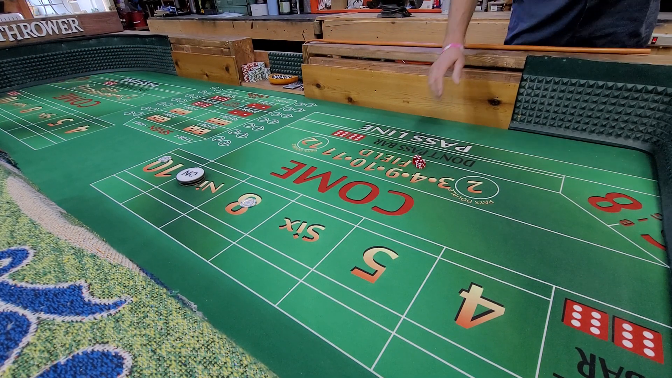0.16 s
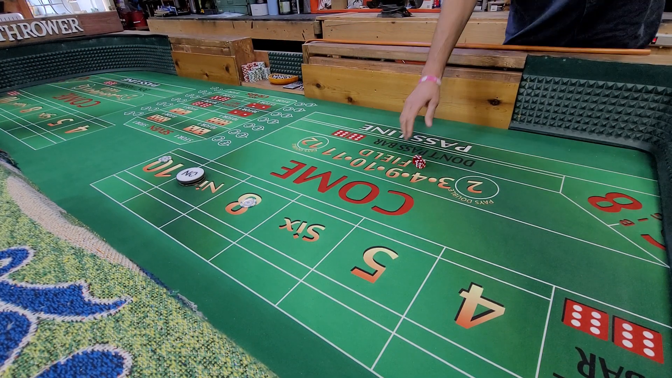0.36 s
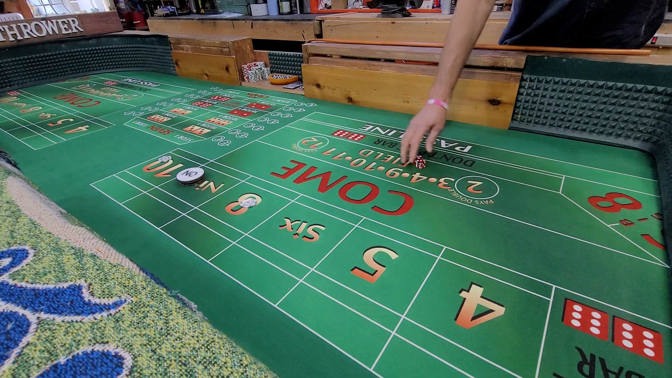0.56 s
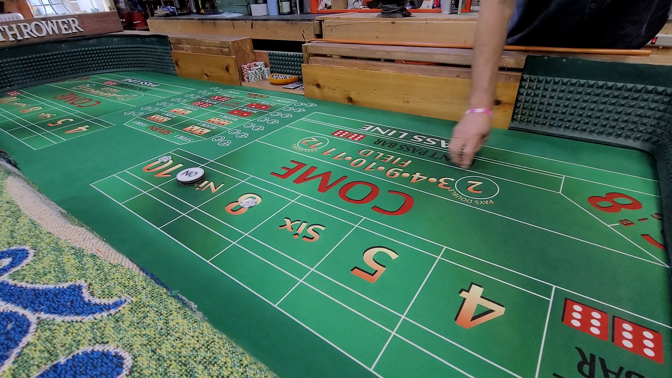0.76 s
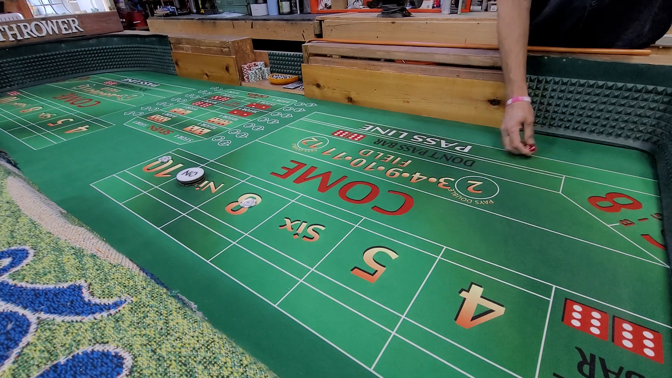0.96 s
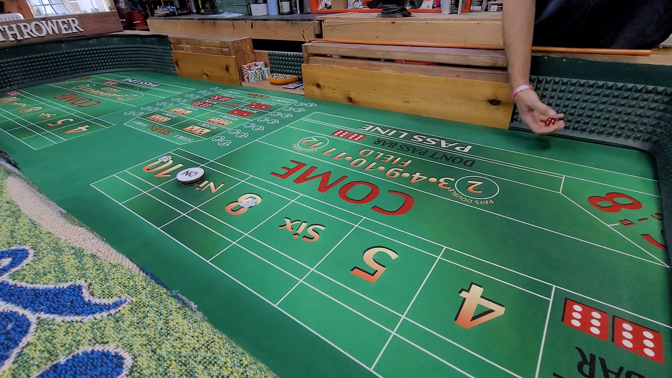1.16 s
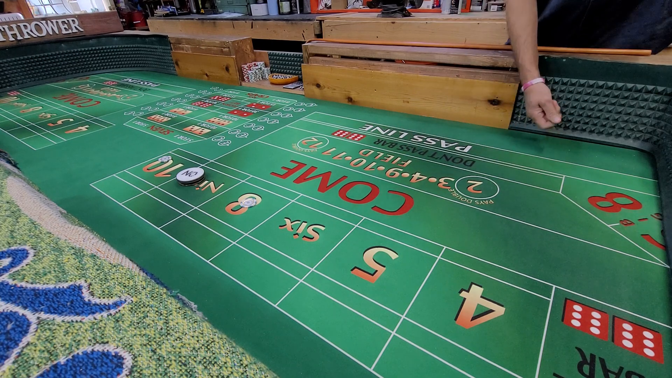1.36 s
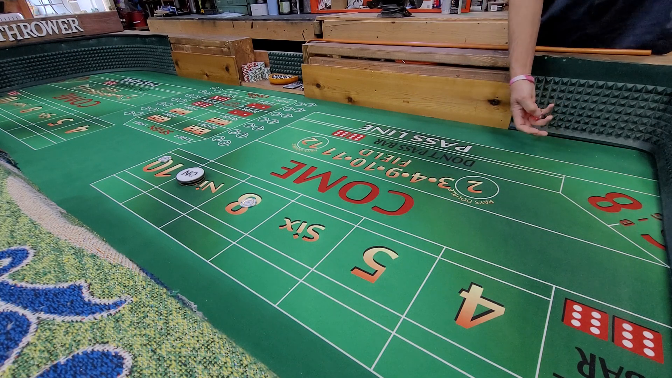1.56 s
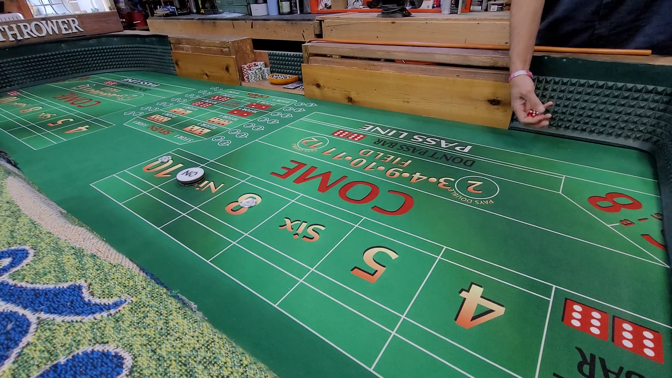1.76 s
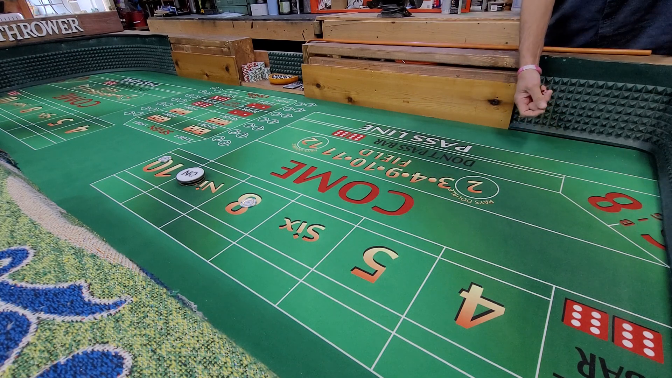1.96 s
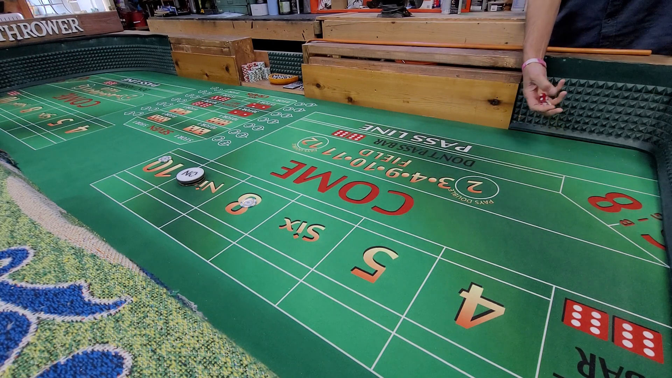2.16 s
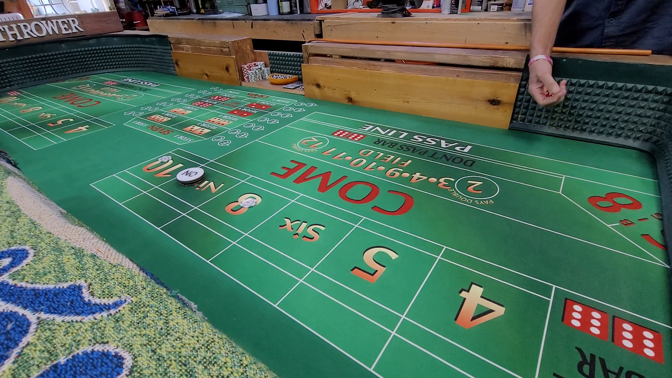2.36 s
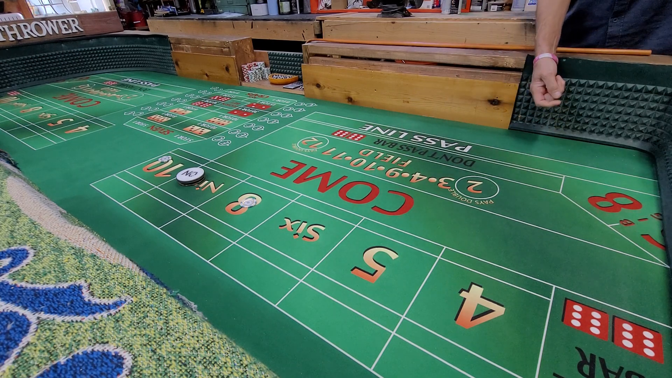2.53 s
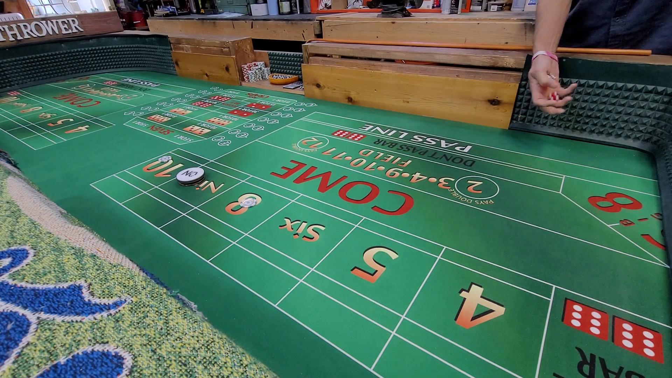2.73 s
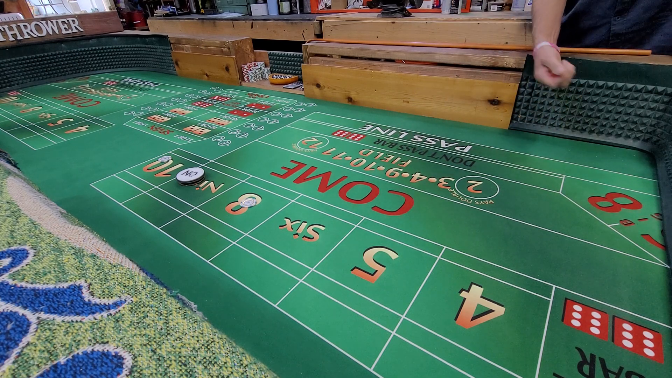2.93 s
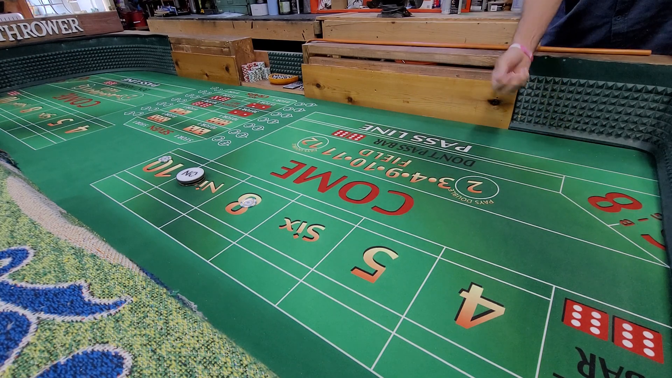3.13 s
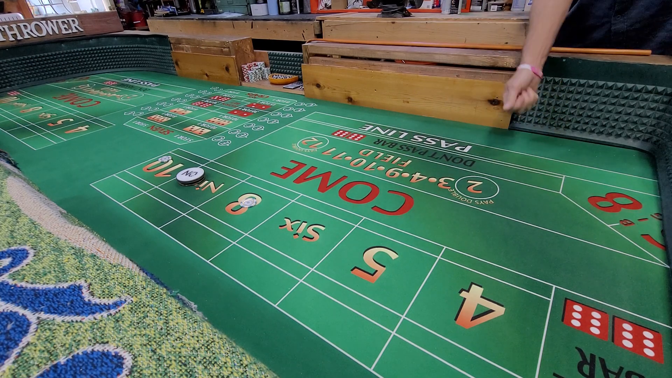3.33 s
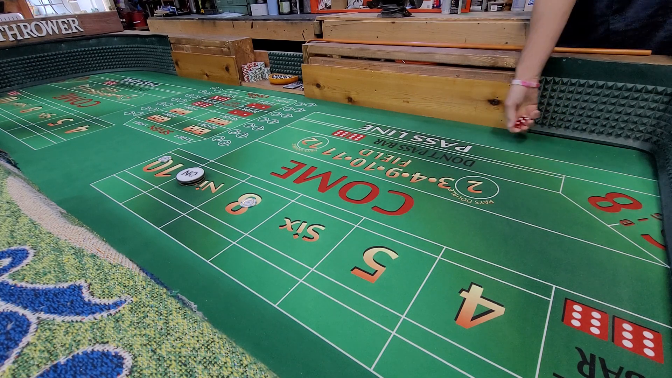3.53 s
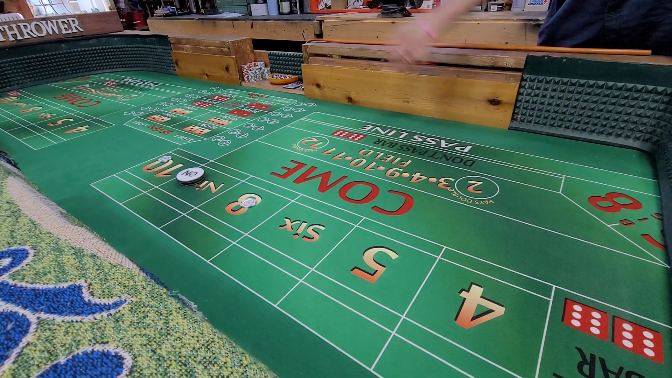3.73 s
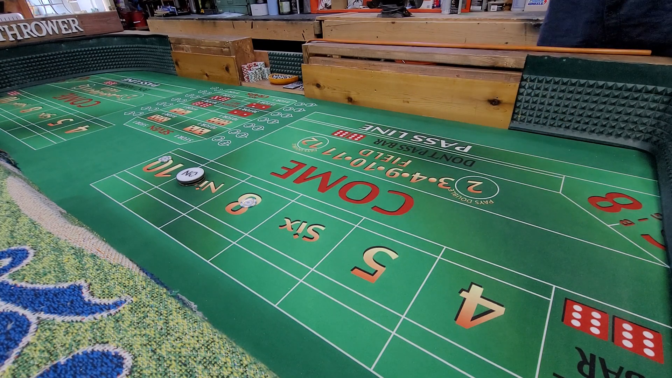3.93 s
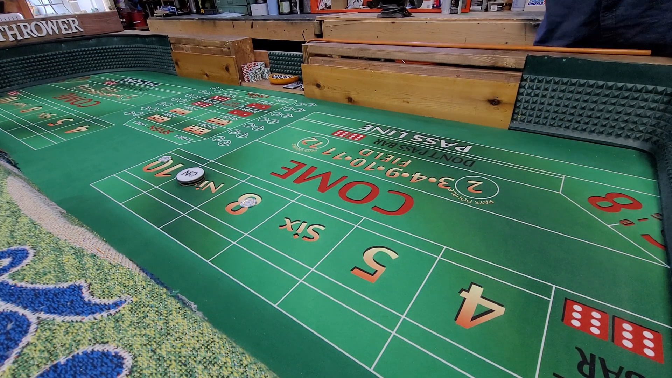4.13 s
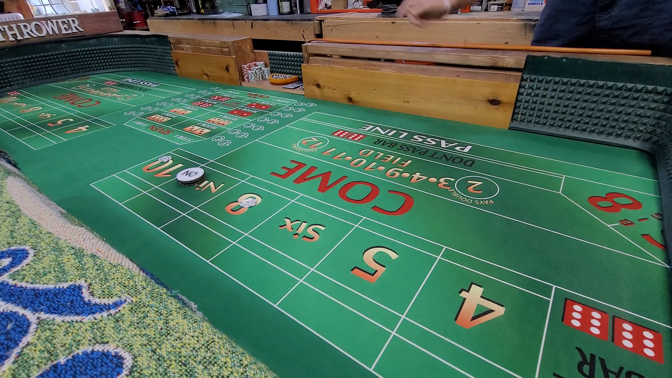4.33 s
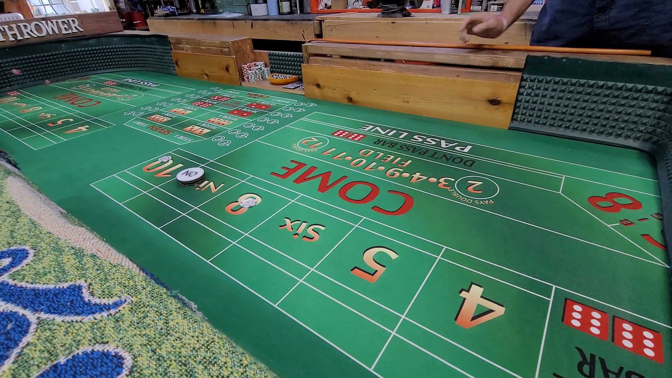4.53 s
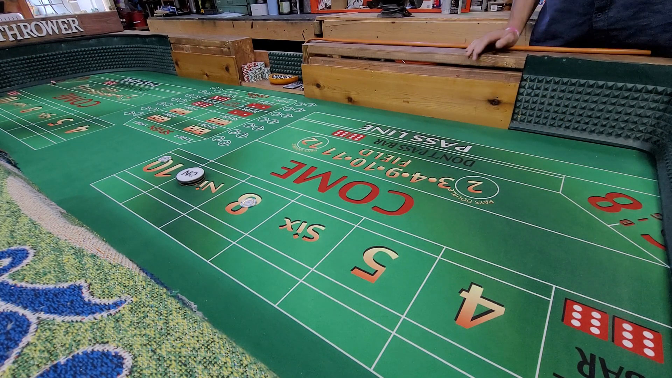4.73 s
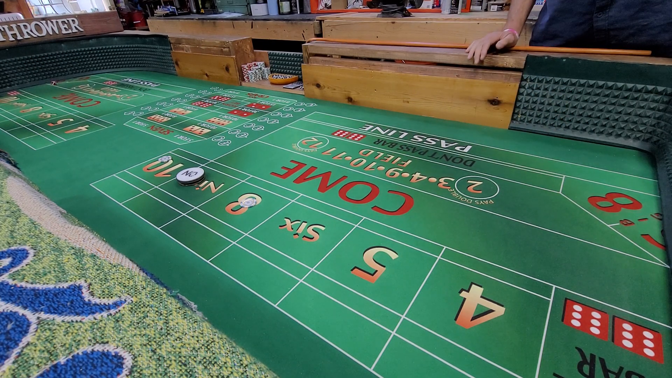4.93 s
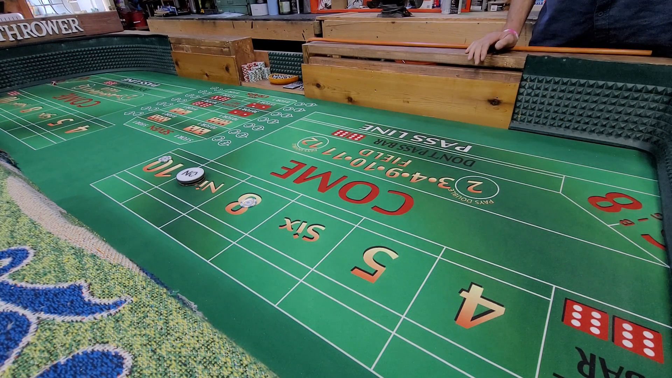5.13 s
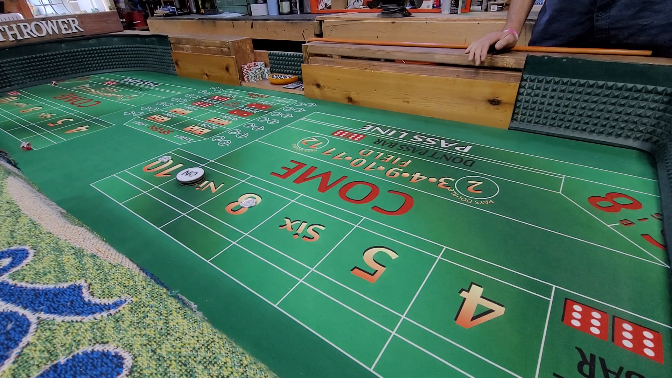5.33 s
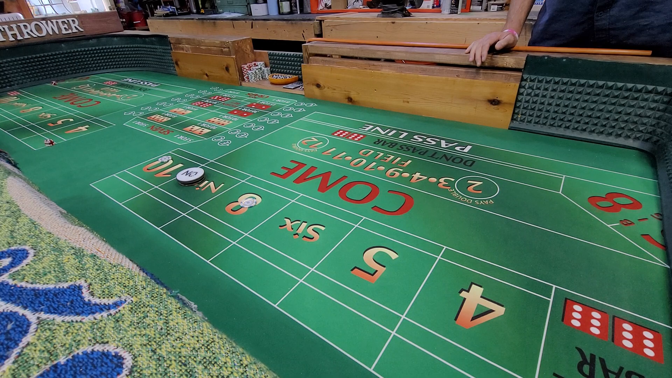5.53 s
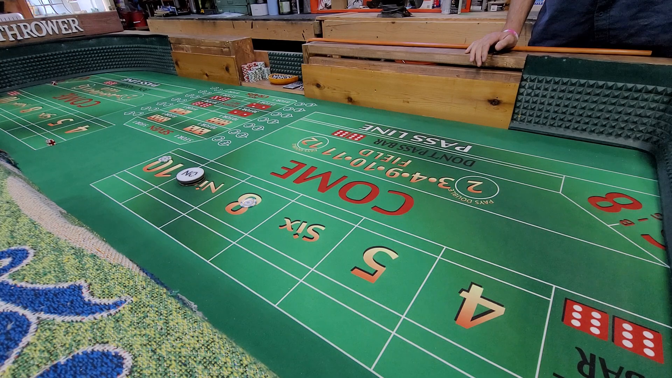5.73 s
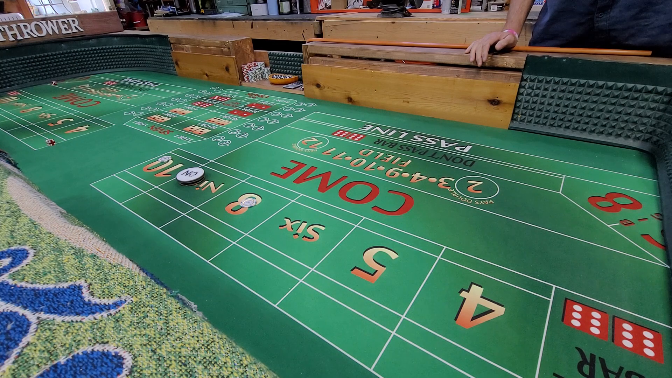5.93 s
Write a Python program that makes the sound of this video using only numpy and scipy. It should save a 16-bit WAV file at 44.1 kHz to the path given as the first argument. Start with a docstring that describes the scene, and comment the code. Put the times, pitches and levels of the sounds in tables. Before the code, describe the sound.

In a quiet room, a hand picks up two dice from a felt gaming table and clicks them together irregularly, faster just before the throw. After about a second of near silence they land far down the table with a loud woody thud and bright clack, bump again, knock the end wall, and tumble more and more dully. Low rumble and faint pulsing insect-like hiss continue; stereo microphone at the table.

```python
"""Two dice click together in one hand over a felt craps table, as small hollows rung by impact.
Thrown to the far end, they land with a thud (damped modes of the wooden bed) and a bright clack (cracks and
high modes), knock the end wall and tumble on ever more softly. Dense decaying noise makes the room.
Fingers brush the felt and small tocks sound, over a low rumble and a throbbing hiss like an insect chorus,
both of them coloured noise."""
import sys
import numpy as np
from scipy import signal
from scipy.fft import rfft, irfft
from scipy.io import wavfile
from scipy.ndimage import uniform_filter1d

SR = 44100
rng = np.random.default_rng(int(sys.argv[2]) if len(sys.argv) > 2 else 0)


def unload_audio(sound):
    """Save the sound as a 16-bit wav file, at the path given as the first command line argument."""
    columns = np.transpose(np.atleast_2d(sound))
    # keep every value between -1 and 1, then stretch to whole-number steps
    steps = np.round(np.clip(columns, -1, 1) * 32767)
    wavfile.write(sys.argv[1], SR, steps.astype(np.int16))


N = 264140
TIME = np.arange(N) / SR  # time in the scene [s]
AGE = TIME[:SR * 3 // 4]  # time since a hit [s]

# dice meeting in the hand: (time [s], level [dB], ring [Hz], sharp edge [dB], room [dB],
# delay until they touch again [ms], 0 for none)
HAND_CLICKS = [(0.7187, -26.5, 2870, -14, -16.5, 2), (1.263, -30, 3750, 1.5, -21, 0),
               (1.7521, -21, 3350, -37, -13.5, 0), (2.188, -26.5, 2950, -19, -12, 5.5),
               (2.1971, -30, 3050, 5, 0, 0), (2.437, -42.5, 2900, -20, 0.5, 0),
               (2.591, -42.5, 3340, -6, -12, 1), (2.891, -34, 2700, -24, -11, 0),
               (2.9246, -26.5, 3600, -16, -11, 12), (3.0522, -32.5, 2700, -22, -4.5, 0),
               (3.169, -30, 3560, -25, -7.5, 5), (3.3731, -29, 2500, -28, -7, 12.5),
               (3.4594, -34, 3900, -2, -8, 1)]
# colour of the sharp edge: (frequency [Hz], level [dB])
EDGE_COLOUR = [(700, -5), (1400, -7), (3000, 3), (6500, 7.5), (8500, -1), (9800, -10), (11500, -10),
               (13000, -10), (15500, -13)]
REBOUND_DB = 0.5  # the second touch against the first
SWELL_CYCLES = 0.67  # the hollow between the dice reaches its crest in this many cycles
PALM_SPARED = 2.5  # how strongly a sharp, edge-on touch keeps its push out of the palm


def hand_clicks(palm_hz=1850, palm_db=-8, palm_t60=0.0024, edge_t60=0.0054, cut_hz=1400):
    """Cavity resonance: a touch rings the hollow between the dice and the palm; so small a source has no bass."""
    out = np.zeros((2, N))
    palm = ring([(palm_hz, palm_db, palm_t60)])
    no_bass = signal.butter(4, cut_hz, "highpass", fs=SR, output="sos")
    # the hand beams its ring at the microphone, so the room gets less of that band
    room_colour = [(1500, 7.5), (2600, 3), (3600, 3.5), (6000, -3.0), (12000, 7)]
    for s, db, hz, edge_db, room_db, rebound_ms in HAND_CLICKS:
        lag_ms = -.21 + 0.071 * rng.standard_normal()  # the hand moves about, right of centre
        swell = hz * AGE / SWELL_CYCLES
        hollow = swell * np.exp(1 - swell) * np.sin(2 * np.pi * hz * AGE)
        body = hollow + palm / (1 + PALM_SPARED * undb(edge_db))
        edge = undb(edge_db) * np.linalg.norm(hollow) * snap(EDGE_COLOUR, edge_t60, lag_ms)
        click = signal.sosfilt(no_bass, ports(body, lag_ms) + edge)
        reflections = diffuse(stretch=0.84, early_db=2.5, early_t60=0.056)
        room = colour(unit(reflections), room_colour)
        touches = [(s, db)]
        if rebound_ms > .5:
            touches.append((s + rebound_ms / 1000, db + REBOUND_DB))
        for touch_s, touch_db in touches:
            add(out, touch_s, undb(touch_db) * click)
            add(out, touch_s + 0.0018, undb(touch_db + room_db) * through(click[1], room))
    return out


# dull blows on the felt, an early one already fading, then the thrown dice: (time [s], level [dB])
FELT_THUDS = [(-.06, -12), (4.4515, -5), (4.454, 2.5), (4.467, 2.5), (4.478, 0), (4.81, 4.5), (5.221, -3),
              (5.353, -11.5), (5.448, -21), (5.543, -29)]
# modes of the table bed: (frequency [Hz], level [dB], t60 [s])
TABLE_BED_MODES = [(86.7, -8, 1), (135.2, -2.5, 0.58), (200.5, 0.5, 0.37), (226, -4, 0.27),
                   (295, -2.5, 0.26), (327.7, 1, 0.16), (361.3, -5, 0.37), (441.5, 1.5, 0.37),
                   (461, -6, 0.13), (565, -0.5, 0.36), (605, -3, 0.52), (694, -8, 0.56), (673, -0.5, 0.52),
                   (816, 1, 0.47), (850, 4.5, 0.19), (1132, -3.5, 0.43), (1160, -20, 0.18),
                   (1157, -1, 0.44), (1283, -0.5, 0.48), (1660, -6.5, 0.62), (1610, -11.5, 0.24),
                   (1760, -0.5, .3), (1860, 0, 0.29), (2050, -5, 0.39)]
# colour of the bed's blow and dense ringing: (frequency [Hz], level [dB])
BED_COLOUR = [(50, -31), (90, 1), (170, -4), (350, 3.5), (520, 2), (1000, -3.5), (1700, -1), (2400, -4),
              (4000, -9), (9000, -6)]
# the thrown dice land, then lose speed, and the felt's softness corner falls with it
LANDS_S, LANDING_HZ, SLOWING_S = 4.474, 1227, 0.53


def thuds(modes_db=2.5, dense_db=6, blow_db=2, lag_ms=0.46, scatter_ms=0.13, pan_db=-1):
    """Contact time on felt: the slower the die, the longer the push and the duller the bed's modal answer."""
    out = np.zeros((2, N))
    blow = unit(colour(ports(1. * (AGE == 0), lag_ms), BED_COLOUR))
    for s, db in FELT_THUDS:
        soft_hz = LANDING_HZ * np.exp(-max(s - LANDS_S, 0) / SLOWING_S)
        dense = unit(colour(diffuse(stretch=0.98, early_db=-27, early_t60=0.055), BED_COLOUR))
        modal = board(TABLE_BED_MODES, lag_ms, scatter_ms)
        answer = undb(modes_db) * modal + undb(dense_db) * dense + undb(blow_db) * blow
        cushion = signal.butter(2, soft_hz, fs=SR, output="sos")
        add(out, s, undb(db) * signal.sosfilt(cushion, answer))
    return out * undb([[pan_db], [-pan_db]])


# hard dice faces clacking as they land: (time [s], level [dB], sharp edge [dB])
DICE_CLACKS = [(4.459, -14, -11), (4.4608, -8, -38), (4.462, -3, -1), (4.464, -10.5, 7)]
# modes of the clack before the direct sound's extra fade: (frequency [Hz], level [dB], t60 [s])
CLACK_RING_MODES = [(4555, -8.5, 0.071), (5130, 0, 0.026), (6120, 1.5, 0.044), (6380, -10, 0.046),
                    (6570, -2, 0.049), (6950, 1.5, 0.047), (7770, -8, .04)]
# colour of the crack and its room: (frequency [Hz], level [dB])
CLACK_COLOUR = [(800, -1), (1800, -2.5), (2600, -4.5), (3300, -4), (4400, -5.5), (6300, -4), (8200, -5.5),
                (9300, -3.5), (11500, 0), (13000, -5), (14200, -12), (15500, -15)]


def clacks(ring_db=3, edge_db=0, ring_room_db=2, edge_room_db=5, rattle_t60=0.0085, lag_ms=0.332, pan_db=2):
    """Impact of stiff bodies: bare plastic on plastic gives a crack and a high ring that the room prolongs."""
    out = np.zeros((2, N))
    tone = ring(CLACK_RING_MODES)
    for s, db, sharp_db in DICE_CLACKS:
        direct = undb(ring_db) * unit(ports(tone * fade(rattle_t60), lag_ms))
        direct = direct + undb(edge_db + sharp_db) * snap(CLACK_COLOUR, 0.0014, lag_ms)
        room = diffuse(stretch=1.0, early_db=-16, early_t60=0.14)
        ring_room = undb(ring_room_db) * unit(through(tone, room))
        edge_room = undb(edge_room_db + sharp_db) * unit(colour(room, CLACK_COLOUR))
        add(out, s, undb(db) * direct * undb([[pan_db], [-pan_db]]))
        add(out, s + .004, undb(db) * (ring_room + edge_room))
    return out


# a die against the end wall: (time [s], level [dB])
END_WALL_KNOCKS = [(4.9492, 1.5)]
# modes of the end wall: (frequency [Hz], level [dB], t60 [s])
END_WALL_MODES = [(299, -8.5, 1), (361, -8, 0.7), (422, -1.5, 0.38), (640, -5, 0.34), (672, 1.5, .3),
                  (713, -1, 0.23), (766, -1, 0.51), (800, 3, 0.45), (880, 4.5, 0.5), (980, -15, 0.3),
                  (1026, -13, 0.36), (1154, 6, 0.32), (1200, 0, 0.55), (1266, 2, 0.38), (1310, -6, 0.35),
                  (1430, -5, 0.28), (1526, -9, .42), (1580, -1, 0.48), (1700, -5, 0.48), (1775, -3, 0.3),
                  (1840, -8, 0.38), (1906, -6, 0.49), (1975, -14.5, 0.52), (2030, -13.5, 0.36),
                  (2156, -17, 0.23)]
# colour of the wall's blow and dense ringing: (frequency [Hz], level [dB])
WALL_COLOUR = [(150, -44.5), (260, -3.5), (380, -5.5), (750, 0), (1050, -1.5), (1300, -0.5), (1850, -2.5),
               (2250, -16), (2700, -29.5), (3700, -20.5), (4800, -37), (14000, -58)]


def wall_knocks(modes_db=5.0, dense_db=5, blow_db=-4, lag_ms=0.42, scatter_ms=0.064):
    """Panel modes: the end wall answers higher than the bed; its rubber facing swallows the treble."""
    out = np.zeros((2, N))
    blow = unit(colour(ports(1. * (AGE == 0), lag_ms), WALL_COLOUR))
    for s, db in END_WALL_KNOCKS:
        dense = unit(colour(diffuse(stretch=1.04, early_db=-39, early_t60=.1), WALL_COLOUR))
        modal = board(END_WALL_MODES, lag_ms, scatter_ms)
        answer = undb(modes_db) * modal + undb(dense_db) * dense + undb(blow_db) * blow
        add(out, s, undb(db) * answer)
    return out


def rolling(db=-55.5):
    """Rolling noise: turning dice murmur in the bed, a low band that is faint until they tumble."""
    band = [(40, -29), (65, -1.5), (130, 1), (180, 0), (280, -30), (800, -58)]
    murmur = shape(noise(TIME, RINGING_WIDTH), undb(along(band, bins(TIME))))
    return level(murmur, db) * np.interp(TIME, [4.95, 5.25, 5.6, 6], [0.083, 1, 0.98, 0.88])


def felt_brush(s=0.86, spread_s=0.079, db=-60.5):
    """Friction noise: fingers sweep over the cloth as they gather the dice, a hiss that swells and fades."""
    cloth = [(500, -5), (1500, 9.5), (4000, 0), (9000, -4), (11500, -2), (15500, -4)]
    hiss = colour(rng.standard_normal((2, N)), cloth)
    return level(hiss, db) * np.exp(-((TIME - s) / spread_s) ** 2)


# small dull tocks around the table: (time [s], frequency [Hz], level [dB], t60 [s])
TABLE_TOCKS = [(.41, 448, -44, 0.067), (.928, 1460, -39.5, 0.042), (4.745, 445, -40, 0.15)]


def tocks(rise_s=0.0017, lag_ms=0.24):
    """Single-mode excitation: each soft touch sounds one short note with a rounded onset."""
    out = np.zeros((2, N))
    for s, hz, db, t60 in TABLE_TOCKS:
        note = ring([(hz, db, t60)]) * (1 - np.exp(-AGE / rise_s))
        add(out, s, ports(note, lag_ms))
    return out


# colour of the far insect chorus: (frequency [Hz], relative level [dB])
CHORUS_COLOUR = [(2400, -29), (3000, -19), (3800, -8), (4300, -8), (4900, -5), (5500, -4.5), (6500, -10.5),
                 (7300, -18.5), (8200, -20.5), (9200, -39.5), (10800, -32), (12500, -38.5), (15500, -34)]
# colour of the nearest caller: (frequency [Hz], relative level [dB])
CALLER_COLOUR = [(4500, -24), (5700, -2.5), (6400, -0.5), (7000, 2.5), (7600, -13.5), (8200, -15),
                 (9200, -29), (10800, -23), (13000, -36), (15500, -35)]
# the nearest insect chirps at a steady pace
FIRST_CHIRP_S, CHIRP_PERIOD_S = .195, .3295


def insects(chorus_db=-53.0, caller_db=-59.0, chirp_s=0.11, stroke_hz=78, stroke_depth=0.99,
            waver_db=0.74, paths_t60=0.14, blur=0.7, pan_db=-1):
    """Amplitude modulation: one caller rasps by wing strokes in steady chirps; a far chorus blurs into hiss."""
    crowd = level(far(rng.standard_normal(N), paths_t60), 0) + blur * rng.standard_normal((2, N))
    chorus = colour(crowd, CHORUS_COLOUR) * undb(waver_db * walk(10))
    chirp_times = np.arange(FIRST_CHIRP_S, N / SR, CHIRP_PERIOD_S)
    chirps = sum(np.exp(-((TIME - s) / chirp_s) ** 2) for s in chirp_times)
    stroke_rate = stroke_hz * (1 + 0.0486 * walk(15))
    strokes = 1 + stroke_depth * np.sin(2 * np.pi * np.cumsum(stroke_rate) / SR)
    rasp = rng.standard_normal(N) * chirps * strokes
    caller = colour(far(rasp, paths_t60), CALLER_COLOUR)
    return level(chorus, chorus_db) + level(caller, caller_db) * undb([[pan_db], [-pan_db]])


# spectrum of the low room noise: (frequency [Hz], relative density [dB per Hz])
RUMBLE_SPECTRUM = [(12, -59), (20, -14), (38, -5), (90, -2.5), (150, -13.5), (177, -14), (305, -18),
                   (339, -19.5), (409, -18), (573, -20), (853, -20), (1050, -27), (1350, -25), (2380, -31),
                   (3000, -38.5), (3900, -43), (6600, -120)]
# width of the rumble: (frequency [Hz], side minus mid [dB])
RUMBLE_SIDES = [(40, -2), (100, -19), (200, -4.5), (400, 2), (900, 7.5), (3000, 0)]
RUMBLE_DB = -54.5  # rms level before panning


def rumble(waver_db=1, pan_db=-0.82):
    """Shaped noise: low room noise that wanders in level, most alike on both sides near 100 Hz."""
    air = shape(noise(TIME, RUMBLE_SIDES), undb(along(RUMBLE_SPECTRUM, bins(TIME))))
    return level(air * undb(waver_db * walk(6.165)), RUMBLE_DB) * undb([[pan_db], [-pan_db]])


def snap(points, t60, lag_ms):
    """Broadband impact: a very short burst of noise is the crack of two hard faces meeting."""
    return unit(colour(ports(rng.standard_normal(len(AGE)) * fade(t60), lag_ms), points))


def board(modes, lag_ms, scatter_ms):
    """Modal radiation of a wide panel: each mode has its own place, so its own lag between the microphones."""
    lags = lag_ms + scatter_ms * rng.standard_normal(len(modes))
    signed = [(-1) ** k * ring([mode]) for k, mode in enumerate(modes)]
    return unit(sum(ports(tone, lag) for tone, lag in zip(signed, lags)))


def ring(modes):
    """Modal superposition: damped sines start together with alternating signs."""
    out = 0
    for k, (hz, db, t60) in enumerate(modes):
        out = out + (-1) ** k * undb(db) * np.sin(2 * np.pi * hz * AGE) * fade(t60)
    return out


def fade(t60):
    """Exponential decay: a hit falls by 60 dB in t60 seconds."""
    return undb(-60 * AGE / t60)


# decay of table and room, before each source's stretch: (frequency [Hz], t60 [s])
ROOM_DECAY = [(80, 0.71), (200, 0.53), (450, 0.53), (1000, 0.49), (2000, 0.49), (4000, .36), (8000, 0.31),
              (15000, 0.095)]
# width of the ringing and of the rolling: (frequency [Hz], side minus mid [dB])
RINGING_WIDTH = [(80, -24), (170, -21), (330, -0.5), (700, 4.5), (1400, 2.5), (3000, -1), (12000, 1.5)]


def diffuse(stretch, early_db, early_t60):
    """Diffuse field: a quick flurry inside the table, then the room, whose treble dies first."""
    source = noise(AGE, RINGING_WIDTH)
    centres = [hz for hz, _ in ROOM_DECAY]
    flurry = undb(early_db) * fade(early_t60)
    out = 0
    for row, (_, t60) in zip(np.eye(len(centres)), ROOM_DECAY):
        mask = along(list(zip(centres, row)), bins(AGE))  # overlapping bands that sum to one
        out = out + shape(source, mask) * (fade(t60 * stretch) + flurry)
    return out


def through(x, response):
    """Convolution: pass a short sound through a stereo response."""
    return signal.fftconvolve(np.atleast_2d(x), response, axes=1)[:, :len(AGE)]


def far(x, t60):
    """Multipath interference: many fixed paths comb the spectrum differently on each side."""
    paths = rng.standard_normal((2, len(AGE))) * fade(t60)
    return irfft(rfft(x) * rfft(paths, N), N)


def ports(x, lag_ms):
    """Time difference of arrival: the right microphone lags the left by lag_ms, or leads if negative."""
    late = shape(x, np.exp(-2j * np.pi * bins(x) * abs(lag_ms) / 1000))
    pair = np.array([x, late])
    return pair if lag_ms > 0 else pair[::-1]


def noise(like, width):
    """Mid-side synthesis: stereo noise as long as `like`, with a side-to-mid ratio per frequency."""
    mid, side = rng.standard_normal((2, len(like)))
    ratio = undb(along(width, bins(like)))
    mid = shape(mid, 1 / np.hypot(1, ratio))
    side = shape(side, ratio / np.hypot(1, ratio))
    return np.array([mid + side, mid - side])


def walk(rate):
    """Smoothed random levels: held 1 / rate seconds and slewed twice, with a spread near 1."""
    k = int(SR / rate)
    held = np.repeat(rng.standard_normal(N // k + 1), k)
    return np.sqrt(2) * uniform_filter1d(uniform_filter1d(held, k), k)[:N]


def colour(x, points):
    """Minimum phase: a causal filter through (Hz, dB) points, made by folding the cepstrum."""
    size = 2048
    cepstrum = irfft(np.log(undb(along(points, np.fft.rfftfreq(size, 1 / SR)))))
    cepstrum[1:size // 2] *= 2
    cepstrum[size // 2 + 1:] = 0
    response = irfft(np.exp(rfft(cepstrum)))
    return signal.fftconvolve(x, response[None], axes=1)[:, :x.shape[1]]


def shape(x, gain):
    """Spectral filtering: one gain per frequency."""
    return irfft(rfft(x) * gain, x.shape[-1])


def bins(x):
    """Discrete spectrum: the frequencies [Hz] of the transform of x."""
    return np.fft.rfftfreq(x.shape[-1], 1 / SR)


def along(points, hz):
    """Logarithmic pitch scale: read (Hz, value) points on a log-frequency axis."""
    f, value = np.transpose(points)
    return np.interp(np.log(np.maximum(hz, 1)), np.log(f), value)


def undb(db):
    """Decibel law: level to amplitude gain."""
    return 10 ** (np.asarray(db) / 20)


def unit(x):
    """Energy normalization: scale a stereo sound to a mean energy of one per channel."""
    return x / np.sqrt(np.sum(x ** 2) / 2)


def level(x, db):
    """Root mean square: scale to an rms level in dB."""
    return x * undb(db) / np.sqrt(np.mean(x ** 2))


def add(out, s, x):
    """Superposition: mix a sound in at time s; one begun before zero is already dying away."""
    start = int(s * SR)
    out[:, max(start, 0):start + len(AGE)] += x[:, max(-start, 0):N - start]


def scene():
    """Superposition of sources: dice in the hand, dice on the table, and the background."""
    dice = hand_clicks() + thuds() + clacks() + wall_knocks() + rolling()
    return dice + felt_brush() + tocks() + insects() + rumble()


TOP_HZ = 15600  # upper edge of the pass band


def record(dry):
    """Band limiting: the recorder drops the deepest bass and cuts the top."""
    lean = signal.sosfilt(signal.butter(4, 36, "highpass", fs=SR, output="sos"), dry)
    return signal.sosfilt(signal.ellip(10, .2, 80, TOP_HZ, fs=SR, output="sos"), lean)


dry = scene()
out = record(dry)
unload_audio(out)
```